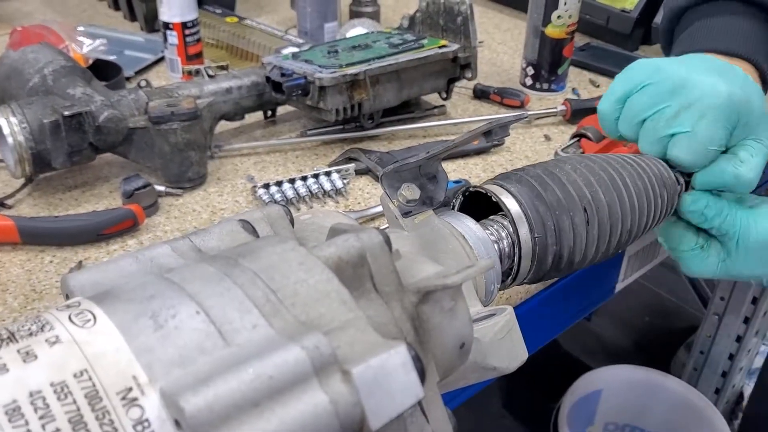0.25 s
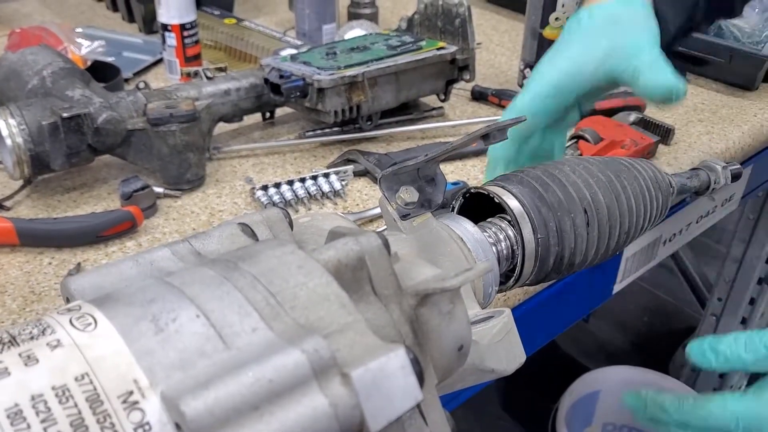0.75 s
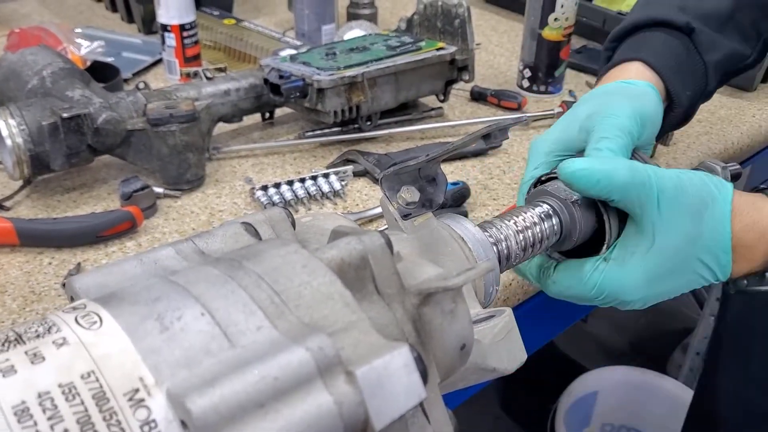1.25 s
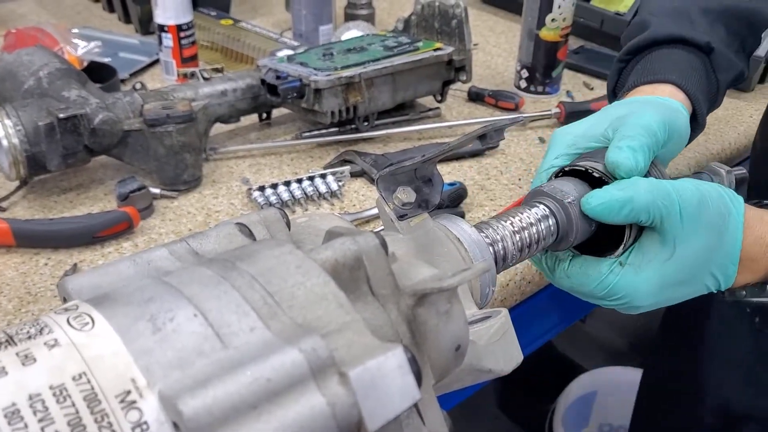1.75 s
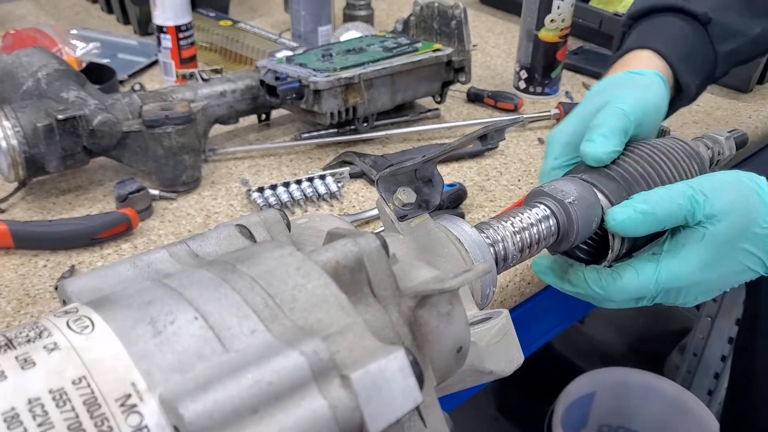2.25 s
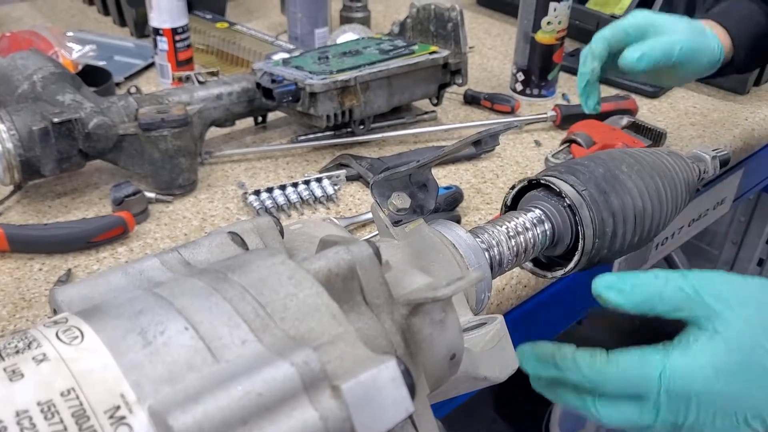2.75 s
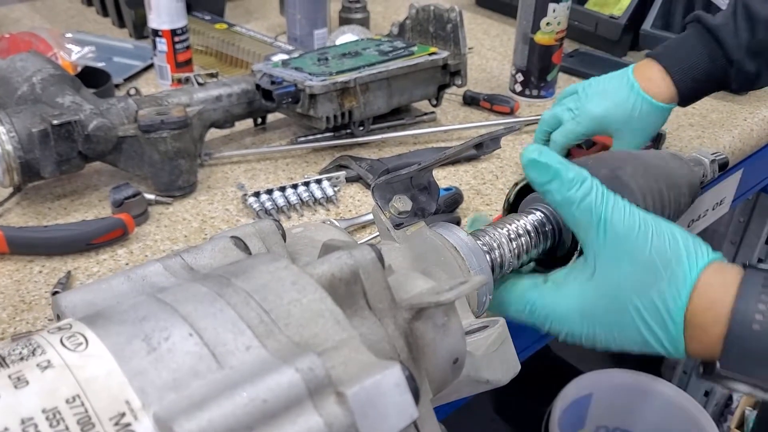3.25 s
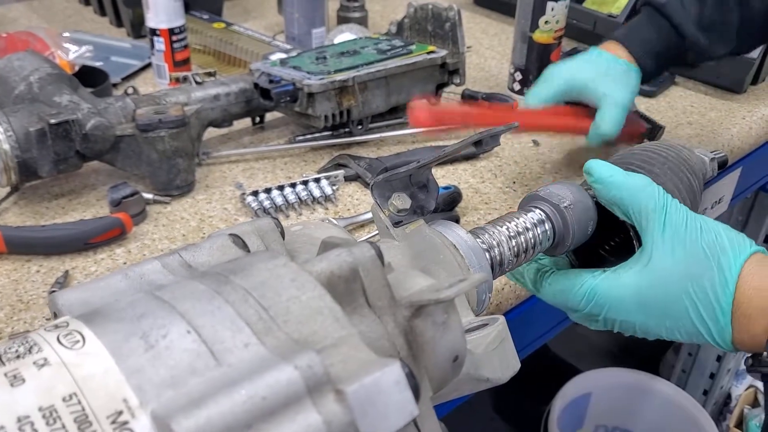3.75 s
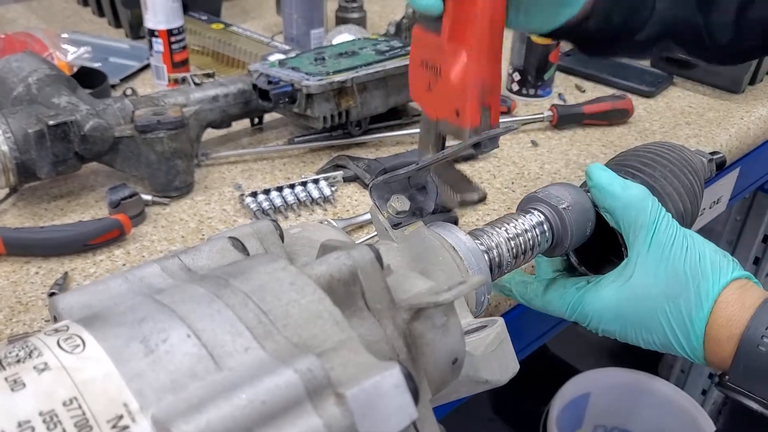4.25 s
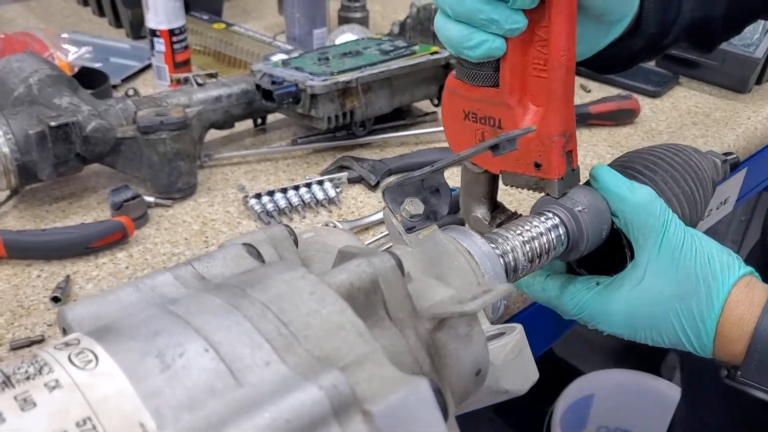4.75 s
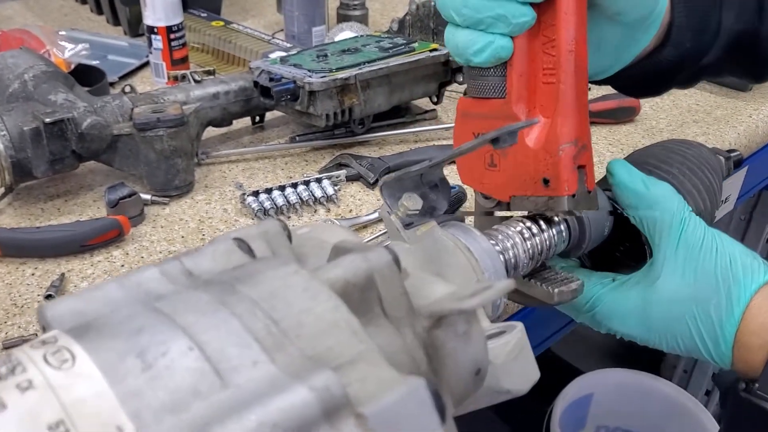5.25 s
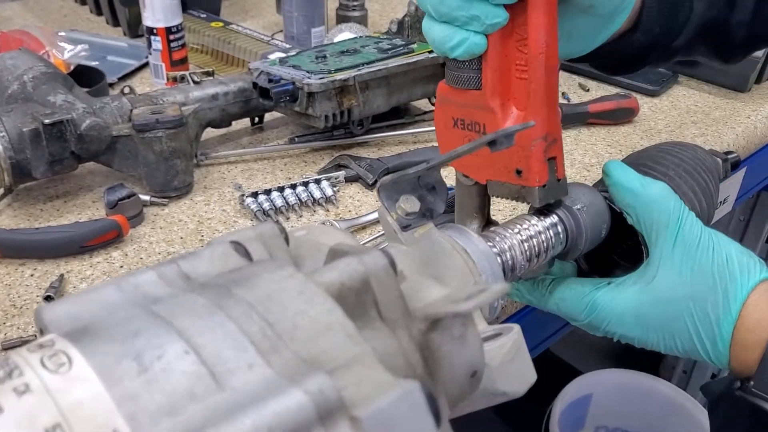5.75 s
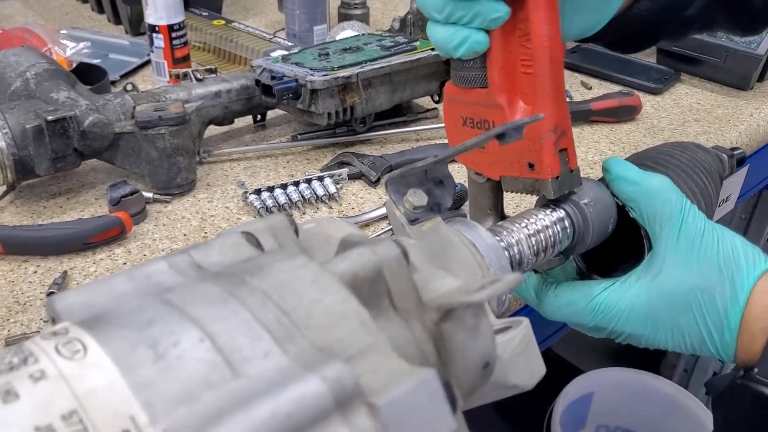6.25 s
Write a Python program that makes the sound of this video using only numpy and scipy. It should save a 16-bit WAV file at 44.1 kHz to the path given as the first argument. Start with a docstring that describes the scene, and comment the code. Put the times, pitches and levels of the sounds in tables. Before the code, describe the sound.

Gloved hands rustle and tick over a rubber boot, one hard knock booms through the workshop, then steel jaws clank onto a joint.

```python
"""Workshop bench with glove, boot and wrench

Gloved hands shift a rubber boot along a steering rack, then set a pipe wrench on the joint.
Gloves rustle and tick (shaped noise), and a clamp, wrench handle, jaws and bench ring as sets of dying or rubbed modes.
One hard knock, a minimum-phase pulse, fills the shop; reverberation, coloured drone and a fan throb lie behind.
"""
import sys
import numpy as np
from scipy import signal
from scipy.fft import rfft, irfft
from scipy.io import wavfile

SR = 44100
rng = np.random.default_rng(int(sys.argv[2]) if len(sys.argv) > 2 else 0)


def int16_out(signal):
    """Quantize to a 16-bit WAV file."""
    q = np.round(np.clip(np.atleast_2d(signal).T, -1, 1) * 32767)
    wavfile.write(sys.argv[1], SR, q.astype(np.int16))


N = 286650    # 6.5 s

# Jaws meeting the rack: (time [s], level [dB], strongest pitch [Hz], treble [dB], bench thud [dB],
# left over right [dB], free ring [dB], strongest ring pitch [Hz])
JAW_CONTACTS = [(4.3664, -8.5, 2000, -41, -21.5, 2, -44.5, 6590),
                (4.459, -10.5, 1520, -19.5, -21.5, 4, -60, 4120),
                (4.5471, -20.5, 1300, -29, -30.5, 10.5, -68, 4950),
                (4.5526, -19.5, 1670, -12.5, -25, 2, -58, 4950),
                (4.7339, -24, 1650, -13, -48, 2, -52, 11300), (5.0814, -37, 1500, -14, -32, 3.0, -75, 3420),
                (5.1139, -21, 1550, -24, -21, 3, -65, 3420),
                (5.1225, -26.5, 3500, -24, -29.5, 2.5, -70, 3420),
                (5.1759, -18, 1670, -19, -27, 11.5, -58.5, 6120),
                (5.179, -5, 3000, -27, -38, 1.5, -31.5, 3420), (5.1835, -9, 1590, -28, -28, 4.5, -39, 1713),
                (5.3355, -11.5, 2250, -12, -28.5, 5.5, -52, 8570),
                (5.5178, -14.5, 1470, -15.5, -29, 5.5, -53, 7585),
                (5.606, -34.5, 1500, -13, -30, 9, -63, 4120), (5.8022, -28, 1207, -28, -35.5, 2, -68, 4120),
                (6.2209, -43, 1230, -32, -37, -4, -85, 1713),
                (6.3728, -41, 1560, -38, -36.5, -1, -85, 1713)]
# How alike the left and right noise are: (frequency [Hz], correlation [-1 to 1])
LEFT_RIGHT_LIKENESS = [(60, 0.9), (180, 0.97), (550, 0.41), (1650, 0.011), (4970, 0.002), (15000, -0.34)]


def from_db(db):
    """Decibels to gain."""
    return 10 ** (np.asarray(db) / 20)


def rms_one(x):
    """Scale to rms 1."""
    return x / np.sqrt(np.mean(x ** 2) + 1e-20)


def in_time(rows, before=None):
    """Draw each column of a timed table as a curve with a value at every sample."""
    times, *columns = np.transpose(rows)
    return [np.interp(np.arange(N) / SR, times, column, before, before) for column in columns]


def at_hz(points, hz):
    """Read a two-column table on a log-frequency axis."""
    table = np.array(points)
    return np.interp(np.log(hz + 1), np.log(table[:, 0]), table[:, 1])


def colour(x, gain_db):
    """Multiply the spectrum by a gain given for each frequency."""
    size = x.shape[-1]
    hz = np.arange(size // 2 + 1) * SR / size
    return irfft(rfft(x) * from_db(gain_db(hz)), size)


def drift(rate):
    """Random wavering: chance points of spread 1, `rate` per second, joined by straight lines."""
    points = int(N / SR * rate) + 2
    return np.interp(np.arange(N) / SR * rate, np.arange(points), rng.standard_normal(points))


def stereo_noise(spectrum, source_gain=1):
    """Coloured noise, rms 1, whose two sides share as much as the likeness table says."""
    hz = np.arange(N // 2 + 1) * SR / N
    mid, side = rfft(rng.standard_normal((2, N)) * source_gain)
    alike = np.clip(at_hz(LEFT_RIGHT_LIKENESS, hz), -1, 1)
    both = np.sqrt(1 + alike) * mid + np.sqrt(1 - alike) * side * [[1], [-1]]
    return rms_one(irfft(both * from_db(at_hz(spectrum, hz)), N))


def strike(modes, extra_db, spread_db, rise_s=0.00017):
    """One blow starts every mode from rest, each with its own chance strength and sign; peak 1."""
    hz, level_db, t60 = np.transpose(modes)[:, :, None]
    t = np.arange(int(t60.max() * SR)) / SR
    chance = rng.standard_normal((len(modes), 2))
    mode_db = level_db + extra_db + spread_db * chance[:, :1]
    signs = np.sign(chance[:, 1:])
    rings = np.sin(2 * np.pi * hz * t) * signs * from_db(mode_db - 60 * t / t60)
    blow = rings.sum(axis=0) * (1 - np.exp(-t / rise_s))
    return blow / np.abs(blow).max()


def burst(low_hz, high_hz, fall_s):
    """A short dying noise burst in one band; peak 1."""
    noise = rng.standard_normal(4096) * np.exp(-np.arange(4096) / SR / fall_s)
    band_filter = signal.butter(2, [low_hz, high_hz], "band", fs=SR, output="sos")
    band = signal.sosfilt(band_filter, noise)
    return band / np.abs(band).max()


def swell(s, rise_s, hold_s, fall_db_per_s):
    """Envelope that rises, holds until hold_s after its start, then fades; cut after one second."""
    out, at, t = np.zeros(N + SR), round(s * SR), np.arange(SR) / SR
    fade = from_db(-fall_db_per_s * np.maximum(t - hold_s, 0))
    out[at:at + SR] = np.clip(t / rise_s, 0, 1) * fade
    return out[:N]


def add(out, s, sound, pan_db=0):
    """Mix a sound in at a time; positive pan leans to the left."""
    at = round(s * SR)
    out[:, at:at + len(sound)] += from_db([[pan_db / 2], [-pan_db / 2]]) * sound[:N - at]


def clanks():
    """Each contact excites damped modes near one pitch, cracks, thuds the bench and rings the loose jaw."""
    # Gripped rack and jaws, heavily damped: (frequency [Hz], level [dB])
    rack_modes = [(660, 2.5), (890, 0.5), (1150, 1.5), (1340, -4), (1490, -0.5), (1680, 0.5), (1850, -4),
                  (2070, -2.5), (2250, -2), (2430, -3.5), (2680, 2), (2950, 2), (3400, 0.5), (3700, -3),
                  (4100, -3.5), (4500, -3), (4870, -7.5), (5650, -11), (6070, -1), (6900, -14.5),
                  (7900, -2), (9000, -21), (10200, -12), (11300, -11)]
    # Bench top: (frequency [Hz], level [dB], decay time t60 [s])
    bench_modes = [(137.8, 0.5, 0.11), (176, -5.5, 0.13), (212.7, -4.5, 0.1), (251.5, -4, 0.064),
                   (308, -8, 0.043), (368, -4, 0.1), (405, -6, 0.089), (487, -10, 0.062), (589, -10, 0.063),
                   (685, -4, 0.068), (807, -5.5, 0.1), (939, -14, 0.099)]
    # Loose jaw ringing on: (frequency [Hz], level [dB], decay time t60 [s])
    jaw_modes = [(809, 13.5, 0.3), (1713, -8.5, 0.45), (3400, -4, .3), (4150, 9, 0.22), (4900, -6, .18),
                 (6170, -8, .2), (6440, 0, 0.25), (7585, -8, 0.27), (8510, -2, 0.28), (10600, -10, .08),
                 (11100, 3, 0.09)]
    rack_t60_s = 0.02
    focus_per_treble = 0.53    # dB per octave for each dB of lost treble: duller contacts keep to their pitch
    ring_focus_db = 21         # falls with the root of the octaves away from the strongest

    out, hz = np.zeros((2, N)), np.array(rack_modes)[:, :1]
    damped_modes = np.hstack([rack_modes, np.full_like(hz, rack_t60_s)])
    # Every jaw mode has a close, weaker twin, so the ring beats
    twins = np.array(jaw_modes) * [1.006, 1, 1] - [0, 5, 0]
    pairs = np.vstack([jaw_modes, twins])
    for s, db, centre_hz, treble_db, thud_db, pan_db, ring_db, ring_hz in JAW_CONTACTS:
        octaves_off = np.abs(np.log2(hz / centre_hz))
        emphasis_db = np.where(hz > 5000, treble_db + 1, focus_per_treble * treble_db * octaves_off)
        clank = strike(damped_modes, emphasis_db, spread_db=1.5, rise_s=0.00027)
        add(out, s, from_db(db - 0.58) * clank, pan_db)

        crack = burst(3400, 7800, fall_s=0.0021)
        add(out, s, from_db(db + treble_db + 0.5) * crack, pan_db)
        chatter = burst(centre_hz / 2.14, centre_hz * 1.73, fall_s=0.01)    # of the loose jaw
        add(out, s, from_db(db - 11) * chatter, pan_db)

        thud = strike(bench_modes, 0, spread_db=6.5, rise_s=0.0078)    # builds up more slowly
        add(out, s, from_db(thud_db + 4) * thud)
        near_db = -ring_focus_db * np.sqrt(np.abs(np.log2(pairs[:, :1] / ring_hz)))
        add(out, s, from_db(ring_db + 4) * strike(pairs, near_db, spread_db=1.5), 3)
    return out


def knock():
    """A hard broad-coloured impulse, minimum phase: its energy comes as early as the colour allows."""
    # The hard knock: (time [s], level [dB])
    knock_times = [(1.82, -1.5)]
    # Its spectrum: (frequency [Hz], level [dB])
    knock_spectrum = [(60, -8), (200, -9.5), (500, -5), (950, -2), (1400, 0), (2000, -4.5), (2450, -3),
                      (3500, -10), (6000, -19), (8100, -18), (11000, -22.5), (16000, -17.5)]

    log_gain = at_hz(knock_spectrum, np.arange(2049) * SR / 4096) * np.log(10) / 20
    cepstrum = irfft(log_gain)
    cepstrum[1:2048] *= 2       # folding the cepstrum forward gives minimum phase
    cepstrum[2049:] = 0
    pulse = irfft(np.exp(rfft(cepstrum)))
    out = np.zeros((2, N))
    for s, db in knock_times:
        add(out, s, from_db(db) * pulse / np.abs(pulse).max())
    return out


def handle():
    """Light taps on the lifted wrench click and set the modes of its free handle ringing."""
    # Taps: (time [s], level [dB], brightness [dB per octave])
    handle_taps = [(3.660, -37, -0.5), (4.006, -26.5, -4.5), (4.018, -29.5, -1), (4.054, -37.5, -7)]
    # Free handle: (frequency [Hz], level [dB], decay time t60 [s])
    handle_modes = [(1410, -9.5, .04), (2452, -1, 0.16), (2477, 1.5, 0.12), (2670, -14.5, .15),
                    (2970, -8, .08), (4090, -6, 0.12), (4800, -15, .08), (4970, -24, 0.27),
                    (5850, -10, 0.13), (7260, -13, 0.11), (8530, -22, .08), (10300, -22, .05),
                    (11740, -22, .18), (14800, -22, .14)]

    out, octaves = np.zeros((2, N)), np.log2(np.array(handle_modes)[:, :1] / 2460)
    for s, db, bright_db in handle_taps:
        ring = strike(handle_modes, bright_db * octaves, spread_db=-0.5, rise_s=0.00074)
        add(out, s, from_db(db) * ring, 3)
        add(out, s, from_db(db - 4.0) * burst(1100, 5300, fall_s=0.0048), 3)
    return out


def ticks():
    """A tick is a dull rubbery pop, a click and a bright snap; its brightness sets their shares."""
    # Ticks of glove, boot and clamp:
    # (time [s], level [dB], brightness [0 pop, 1 click, 2 snap], left over right [dB])
    tick_times = [(0.1235, -29.5, 2.46, -1.5), (0.1325, -29, 2.35, -6), (0.203, -34, 2.35, -5),
                  (0.2338, -21.5, 1.84, -4), (0.409, -26, 1.5, 4), (0.4527, -35, 1.6, -2.5),
                  (0.473, -26.5, 2.2, -7), (0.5108, -30, 1.95, -3), (0.5163, -16, 1.59, 6),
                  (0.7524, -26.5, 0.05, -2), (1.0474, -33.5, 0.05, -2), (1.074, -22, 0.05, 2),
                  (1.0835, -19.5, 0.05, 0), (1.094, -25, 0.52, 1), (1.1023, -27, 0.44, 3.5),
                  (1.115, -28, 0.6, 2), (1.1287, -13, 1.27, 1), (1.246, -17, 1.18, -7),
                  (1.4945, -38.5, 0.26, -2), (1.5575, -35.5, 1.36, -2), (2.0357, -30, 1.95, -9),
                  (2.0787, -32.5, 0.05, -4), (2.1978, -30, 1.95, -2), (2.2115, -24, 2.16, -1.5),
                  (2.2496, -45, 2.04, 0), (2.1684, -37, 2.2, 8), (2.367, -37.5, 0.62, -6),
                  (2.5224, -26.5, 1.04, -1), (2.5333, -31, 1.1, 14), (2.5369, -28, 1.3, 17.5),
                  (3.2322, -33.5, 0.05, 9), (3.451, -42.5, 0.05, 5), (3.5837, -28, 0.54, 2),
                  (4.2148, -26, 0.38, -2), (4.466, -24, 1.6, -6)]
    # Pop, click, snap: (low edge [Hz], high edge [Hz], fall to 1/e [s], level [dB])
    tick_parts = [(1310, 3080, 0.0029, 0.5), (2900, 5760, 0.00067, -3), (6300, 13000, 0.00034, 0)]
    slope_db = 10.5    # loss per step away from the tick's brightness

    out = np.zeros((2, N))
    for s, db, brightness, pan_db in tick_times:
        for k, (low_hz, high_hz, fall_s, part_db) in enumerate(tick_parts):
            share_db = part_db - slope_db * abs(k - brightness)
            add(out, s, from_db(db + share_db) * burst(low_hz, high_hz, fall_s), pan_db)
    return out


def boot():
    """The air in the hollow rubber boot hums briefly when bumped: one softly started, dying mode."""
    # Bumps: (time [s], level [dB], pitch [Hz])
    boot_bumps = [(0.753, -39.5, 491), (0.8, -35, 472), (.869, -46, 475), (1.074, -39, 510.5),
                  (1.104, -37, 513.4), (1.128, -40, 564), (2.523, -44.5, 492), (2.534, -48, 550),
                  (3.231, -39.5, 521)]
    t60_s = 0.13

    out = np.zeros((2, N))
    for s, db, hz in boot_bumps:
        add(out, s, from_db(db) * strike([(hz, 0, t60_s)], 0, 0, rise_s=0.0033))
    return out


def clamp():
    """Rubbing keeps the thin steel clamp's modes singing, each fluttering by itself."""
    # Rubbing over time: (time [s], level [dB], brightness [dB per octave])
    rub_curve = [(0.43, -78, -2), (0.464, -55.5, 8), (0.532, -62, 25), (0.59, -61, 10), (0.63, -55, -1),
                 (0.74, -75, -2), (0.8, -90, -2)]
    # Clamp: (frequency [Hz], level [dB])
    clamp_modes = [(4240, -14), (6923, -2), (8850, -10), (9970, -7), (12000, -16), (13210, 1),
                   (15200, -10.5)]

    rub_db, bright_db = in_time(rub_curve, before=-120)
    out = np.zeros(N)
    for hz, db in clamp_modes:
        phase = 2 * np.pi * hz * np.arange(N) / SR + 1.0 * drift(45)
        tone = np.sqrt(2) * np.sin(phase)
        tilt_db = np.maximum(bright_db, -30) * np.clip(np.log2(hz / 9500), -.5, .5)
        out += tone * from_db(db + rub_db + tilt_db + 6 * drift(45))
    return out * np.ones((2, 1))


def handling():
    """Gloves hiss in fine grains, rubber scuffs; the bench rumbles under the hands and after each thud."""
    # Hands at work: (time [s], glove hiss [dB], rubber scuff [dB], bench rumble [dB])
    hand_curve = [(0.0, -49, -48.5, -56), (0.25, -73, -47, -55), (0.6, -51, -50, -49.5),
                  (1.02, -69, -49.5, -56), (1.4, -53, -49.5, -51.5), (1.65, -64, -51, -51.5),
                  (2.0, -62, -53, -53), (2.3, -69, -61, -64), (2.8, -71, -88, -53.5), (3.08, -81, -69, -57),
                  (3.22, -62.5, -53, -48), (3.7, -69, -52.5, -51.5), (4.1, -83, -49.5, -54.5),
                  (4.35, -89, -58.5, -49.5), (4.9, -61.5, -65, -49), (5.45, -62.5, -56.5, -46),
                  (5.9, -89.5, -72, -55), (6.5, -76.5, -51.5, -47)]
    # A glove, the boot or a jaw starts to slide: (time [s], hiss [dB], scuff [dB], length [s])
    slides = [(0.12, -62, -78, 0.24), (0.388, -49.5, -61, 0.039), (0.458, -48, -55, 0.078),
              (0.763, -52.5, -54, 0.13), (0.867, -52, -58, 0.075), (1.052, -55, -45, 0.14),
              (1.24, -45.5, -48.5, 0.021), (1.96, -54, -49, 0.089), (2.154, -51, -50.5, 0.027),
              (2.501, -51, -47.5, 0.017), (2.732, -63.5, -80, 0.084), (3.004, -62.5, -76, 0.052),
              (3.079, -45.5, -54.5, 0.057), (3.292, -59, -73, 0.018), (3.453, -55.5, -53, 0.025),
              (3.586, -48.5, -48.5, 0.078), (3.866, -48.5, -51, 0.019), (4.085, -47.5, -59, 0.09),
              (4.216, -38, -47, 0.035), (4.492, -73, -36.5, 0.086), (5.07, -56, -38.5, 0.054),
              (5.33, -68, -40, 0.03), (5.597, -80, -48, 0.036), (6.05, -71, -61, 0.4)]
    # Noise spectra of glove, rubber and bench: (frequency [Hz], level per Hz [dB])
    hiss_spectrum = [(1760, -14), (3000, -9), (4540, -7.5), (6570, -11.5), (7940, -5.5), (9140, -14.5),
                     (14400, -20), (16000, -10.5)]
    scuff_spectrum = [(600, 10), (1200, 4.5), (2500, 2), (4000, -7.5), (7000, -55)]
    rumble_spectrum = [(60, 3), (120, -1), (300, 8.5), (500, 5.5), (900, -40.5)]
    slide_rise_s, slide_fall_db_per_s = 0.0084, 135
    shake_db, shake_rise_s, shake_fall_db_per_s = -12, 0.019, 85    # rumble of the bench after a thud

    hiss, scuff, rumble = from_db(in_time(hand_curve))
    for s, hiss_db, scuff_db, length_s in slides:
        shape = swell(s, slide_rise_s, length_s, slide_fall_db_per_s)
        hiss = hiss + from_db(hiss_db) * shape
        scuff = scuff + from_db(scuff_db) * shape
    for s, _, _, _, thud_db, *_ in JAW_CONTACTS:
        shake = swell(s, shake_rise_s, shake_rise_s, shake_fall_db_per_s)
        rumble = np.hypot(rumble, from_db(thud_db + shake_db) * shake)
    grains = from_db(2.1 * drift(300) + 1.5 * drift(40))
    rubbing = hiss * stereo_noise(hiss_spectrum, grains) + scuff * stereo_noise(scuff_spectrum, grains)
    return rubbing + rumble * from_db(2.9 * drift(25)) * stereo_noise(rumble_spectrum)


def drone():
    """Wavering shop noise, with a fan's low throb as a narrow band of noise."""
    # Shop noise: (frequency [Hz], level per Hz [dB])
    drone_spectrum = [(15, -28.5), (25, -2), (54, 3), (208, -10), (291, 0.5), (463, -11), (700, -4),
                      (1440, -17.5), (1870, -15.5), (2480, -21.5), (3850, -30.5), (8150, -54.5),
                      (9270, -50.5), (12000, -40), (15600, -89), (22000, -120)]
    # Throb wavering: (time [s], level [dB])
    fan_curve = [(0.0, -59), (1.2, -55.5), (1.5, -57), (1.8, -49), (2.2, -57), (2.9, -62), (3.3, -46.5),
                 (4.0, -46.5), (4.7, -55.5), (5.2, -43), (5.4, -56), (5.75, -46.5), (6.5, -46.5)]
    drone_db, fan_hz, width_hz = -49, 46.7, 5.5

    throb_spectrum = [(fan_hz - 3 * width_hz, -40), (fan_hz - width_hz, -3), (fan_hz, 0),
                      (fan_hz + width_hz, -3), (fan_hz + 4 * width_hz, -30), (400, -90)]
    noise = from_db(drone_db + 2.9 * drift(3.39)) * stereo_noise(drone_spectrum)
    throb = from_db(in_time(fan_curve)[0]) * stereo_noise(throb_spectrum)
    return noise + throb


def bench_top(x, level_db):
    """Quick reflections off the clutter on the bench, other ones for each side."""
    sparse = rng.standard_normal((2, 300)) * (rng.random((2, 300)) < .06)
    echoes = sparse * np.exp(-np.arange(300) / 183.0)
    echoes = echoes / np.sqrt((echoes ** 2).sum(axis=1, keepdims=True))
    treble = signal.sosfilt(signal.butter(1, 900, "high", fs=SR, output="sos"), x)
    return x + from_db(level_db) * signal.fftconvolve(treble, echoes, axes=1)[:, :N]


def walls(x):
    """A few distinct early echoes, alternating in side and polarity."""
    # Walls and ceiling: (delay [s], level [dB])
    wall_echoes = [(.0075, -1.5), (.0105, -7.5), (.0155, -4), (.027, -6.5), (.0295, -6.5)]
    out = np.zeros((2, N))
    for k, (delay_s, db) in enumerate(wall_echoes):
        add(out, delay_s, (-1) ** (k + 1) * from_db(db) * x.mean(axis=0), 4 * (-1) ** k)
    return out


def shop(x, build_s=0.0024):
    """Diffuse reverberation: octave bands of noise dying at their own rates; unit energy."""
    # Shop reverberation: (frequency [Hz], decay time t60 [s])
    shop_decay = [(100, 0.56), (420, 0.39), (1100, 0.43), (2900, 0.43), (7700, 0.44), (15000, 0.22)]
    t, tail = np.arange(SR * 3 // 4) / SR, 0
    for low in 44 * 2. ** np.arange(9):
        band = signal.butter(2, [low, min(2 * low, 20000)], "band", fs=SR, output="sos")
        common, own = rng.standard_normal(len(t)), rng.standard_normal((2, len(t)))
        alike = np.clip(at_hz(LEFT_RIGHT_LIKENESS, 1.04 * low), 0, 1)
        noise = signal.sosfilt(band, np.sqrt(alike) * common + np.sqrt(1 - alike) * own)
        tail = tail + noise * from_db(-60 * t / at_hz(shop_decay, np.sqrt(2) * low))
    tail = tail * (1 - np.exp(-(t / build_s) ** 2))
    tail = tail / np.sqrt((tail ** 2).sum() / 2)
    return signal.fftconvolve(x.mean(axis=0)[None], tail, axes=1)[:, :N]


def scene():
    """Near sounds ring in the shop about as strongly as directly, the knock far more; the rest stays dry."""
    small = ticks()
    tones = boot() + clamp() + handle()
    steel, blow = clanks(), knock()
    to_shop = from_db(1.0) * small + from_db(-1.5) * tones + from_db(-3.5) * steel + from_db(13.5) * blow
    wet = shop(to_shop)
    early = walls(blow + from_db(-14.5) * (steel + small))
    near = bench_top(small + tones + steel + blow + early, level_db=-2)
    return near + wet + handling() + drone()


def record(dry):
    """The two sides differ in colour; the deepest bass and the top are cut."""
    # Left over right: (frequency [Hz], level [dB])
    side_balance = [(60, 1), (150, 1.5), (380, 0), (950, 0.5), (2380, 1), (5980, 6), (15000, -8.5)]
    left = colour(dry[0], lambda hz: at_hz(side_balance, hz) / 2)
    right = colour(dry[1], lambda hz: -at_hz(side_balance, hz) / 2)
    bass_cut = signal.butter(6, 36, "high", fs=SR, output="sos")
    top_cut = signal.cheby2(20, 60, 16100, fs=SR, output="sos")    # 60 dB down from 16.1 kHz up
    sides = signal.sosfilt(bass_cut, np.array([left, right]))
    return signal.sosfilt(top_cut, np.clip(sides, -1, 1))


dry = scene()
out = record(dry)
int16_out(out)
```